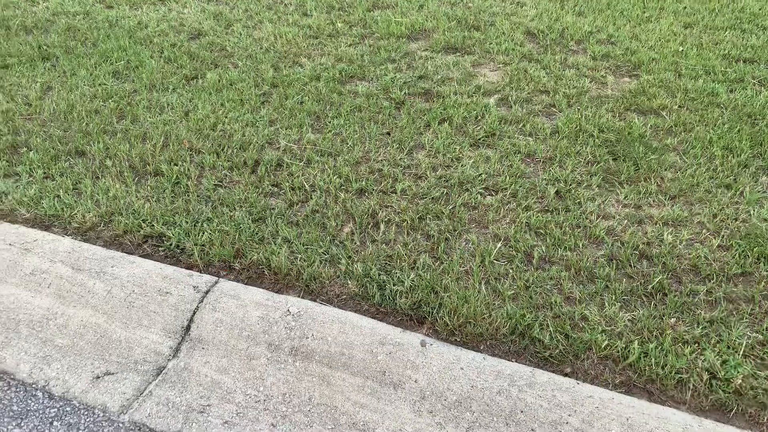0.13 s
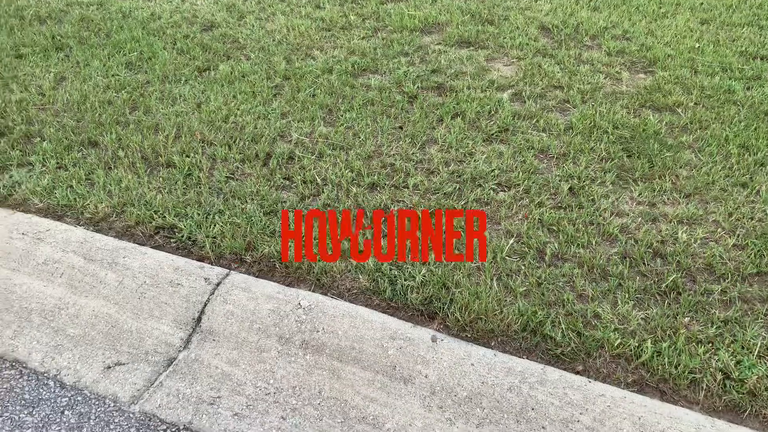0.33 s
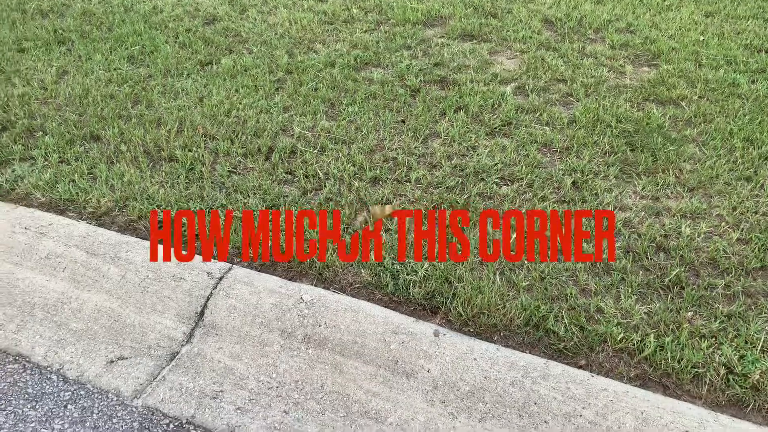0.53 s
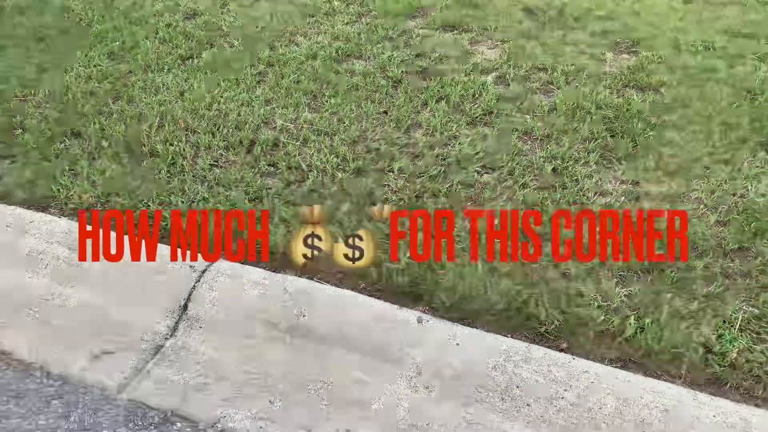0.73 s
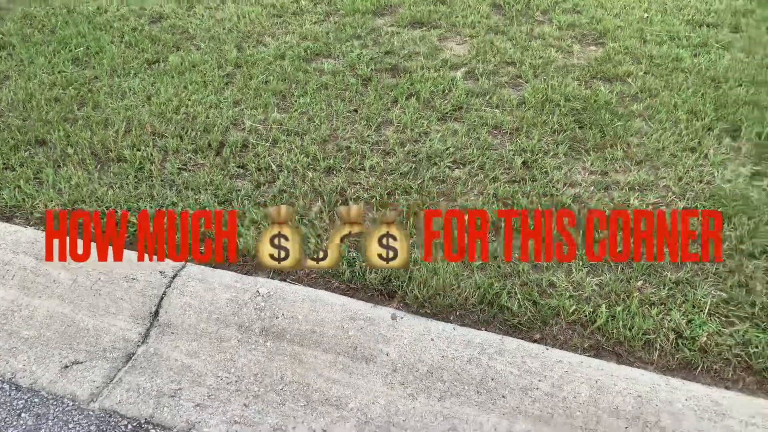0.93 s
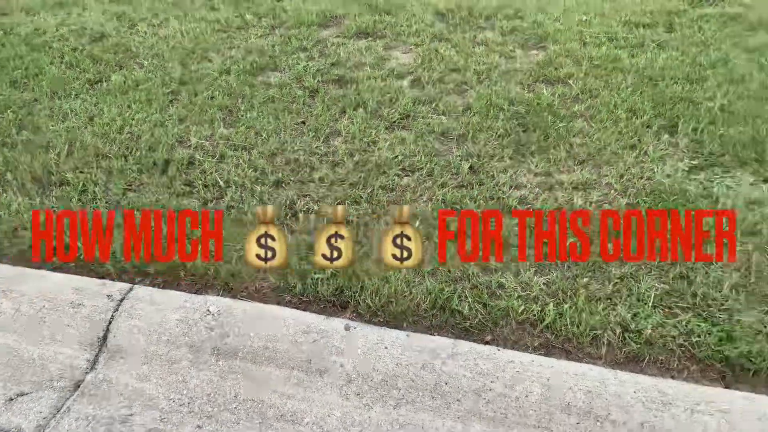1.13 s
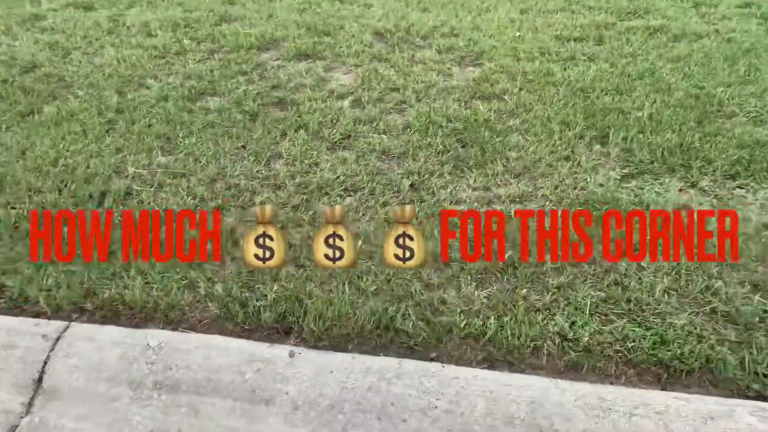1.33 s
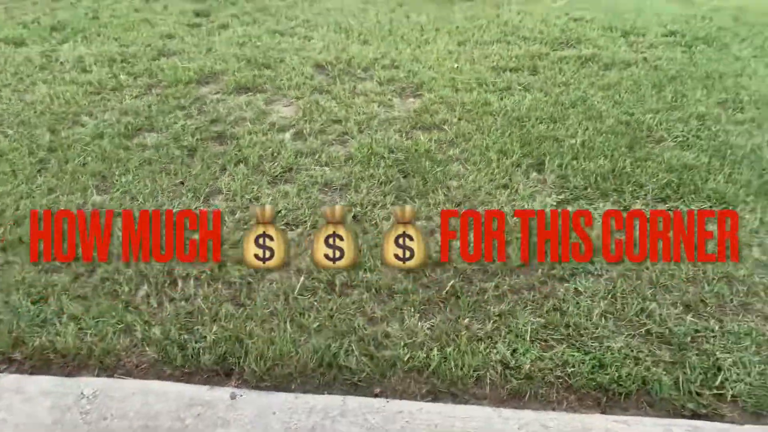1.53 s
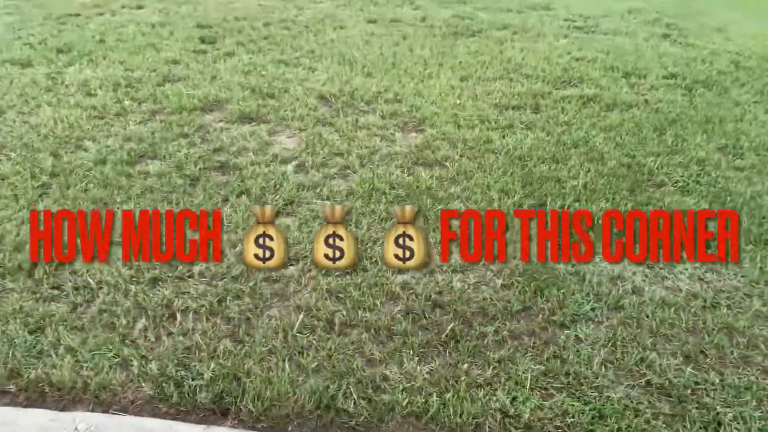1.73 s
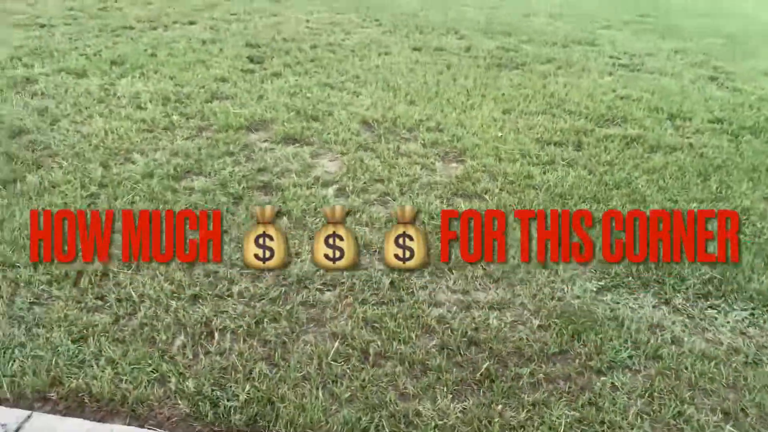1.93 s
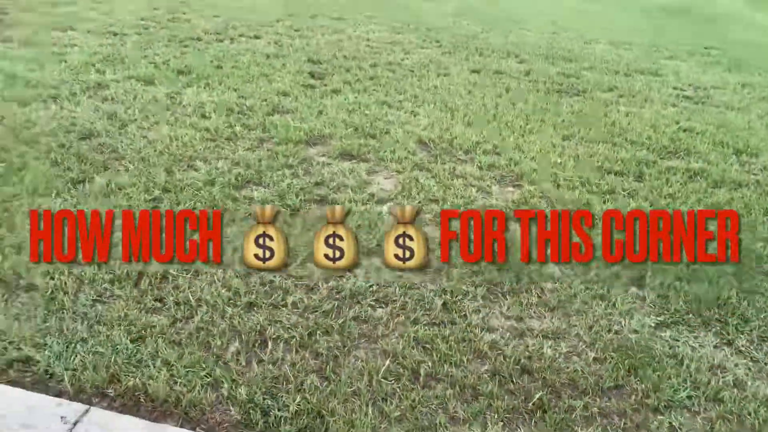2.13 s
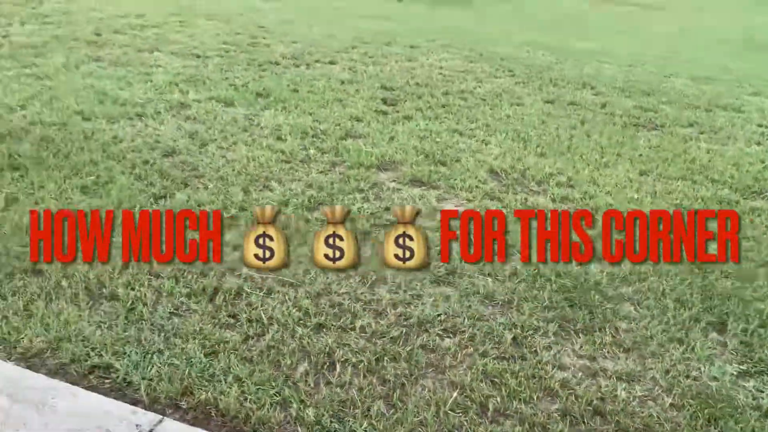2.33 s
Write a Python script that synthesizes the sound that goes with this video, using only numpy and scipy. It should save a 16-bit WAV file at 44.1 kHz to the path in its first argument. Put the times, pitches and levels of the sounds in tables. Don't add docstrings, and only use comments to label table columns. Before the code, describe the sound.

A small petrol mower engine fades in within 0.15 s and runs steadily, about eighteen firings a second, a few metres away outdoors. Puffs ring the muffler, valves clatter, sheet metal rattles, and the fan hums and roars. Airy treble opens until 1.1 s; rattle comes forward around 1.2 s, then recedes by 2 s. Harder firings strike around 2.1 and 2.3 s. Low wind gusts buffet the stereo microphone throughout.

```python
import sys
import numpy as np
from scipy import signal
from scipy.fft import rfft, irfft
from scipy.io import wavfile
from scipy.ndimage import uniform_filter1d

SR = 44100
rng = np.random.default_rng(int(sys.argv[2]) if len(sys.argv) > 2 else 0)


def gain_from_db(level_db):
    decades = np.asarray(level_db, float) / 20
    return 10 ** decades


def persist_wave(psi):
    counts = np.round(np.clip(psi, -1, 1) * 32767).astype(np.int16)
    wavfile.write(sys.argv[1], SR, np.atleast_2d(counts).T)


N = 105795
T = np.arange(N) / SR
FIRE_HZ, JITTER_S = 18.2, 0.001166

# (time [s], level [dB])
GUST_LEVEL = [(0.14, -39), (0.18, -35.5), (0.6, -34.5), (0.62, -25.5), (1.03, -28), (1.18, -23.5),
              (1.22, -30), (1.38, -24.5), (1.65, -32.5), (1.82, -27), (1.86, -55), (1.9, -37),
              (1.99, -32.5), (2.13, -49), (2.15, -31), (2.4, -31)]
# (frequency [Hz], density [dB per Hz])
WIND_SPECTRUM = [(20, -39), (32, -21), (45, -2), (60, -2), (72, 1.5), (90, -5), (150, -10.5), (400, -31)]
# (frequency [Hz], density [dB per Hz])
ROAR_SPECTRUM = [(36, -43), (100, -12), (300, -14.5), (600, -3.5), (1600, -15), (2350, -18), (2600, -23),
                 (3300, -23.5)]
HISS_SPECTRUM = [(3300, 0), (4500, -3.5), (6000, -5), (7300, -10), (8300, -1.5), (9400, -8.5),
                 (10400, -15.5)]
AIR_SPECTRUM = [(10400, -10), (11800, -7.5), (13000, 3.5), (14300, -8), (15600, 0)]
# (time [s], frequency [Hz], level [dB])
FAN_HUM = [
    (0.14, 222.9, -36),
    (0.53, 222.9, -36),
    (0.59, 218.5, -33.5),
    (0.72, 215.8, -34.5),
    (1.28, 219.4, -34.5),
    (1.36, 221.9, -38),
    (1.69, 216.9, -34.5),
    (2.07, 221.5, -33.5),
    (2.28, 212.8, -38),
    (2.4, 220, -34),
]
# (frequency [Hz], width [Hz], level [dB])
DECK_MODES = [(358.4, 17.8, -41.5), (427, 30, -41.5), (268.5, 90, -43.5), (588.4, 28, -46)]
# (frequency [Hz], width [Hz], level [dB])
LOUVRE_MODES = [(2550, 330, 0)]
# (frequency [Hz], width [Hz], level [dB])
CASE_MODES = [(170.4, 43, 6), (109, 13.3, -12), (251.6, 86, -0.5)]
MUFFLER_MODES = [(582.2, 37.5, 7.5), (669, 59, -8), (787, 53.5, -2.5)]
COVER_MODES = [(956, 84, 3.5), (1338, 310, -7)]
SHROUD_MODES = [(2140, 210, -5), (1880, 170, -10.5), (2500, 260, -12.5)]
TAPPET_MODES = [(4140, 960, -2), (3430, 900, -8)]
# (time [s], shroud rattle level [dB], muffler level [dB])
FACING_LEVELS = [
    (0.14, -39.5, -33.5),
    (0.25, -41.5, -36.5),
    (1.12, -40, -32.5),
    (1.2, -33.5, -37.5),
    (1.53, -38.5, -33),
    (2.04, -61.5, -38),
    (2.06, -53, -35.5),
    (2.37, -53, -39.5),
    (2.4, -54, -43),
]
# (place [cycles], rise [s], decay [s], level [dB], spread [dB])
SHROUD_RATTLES = [
    (1, 0.0013, 0.014, 5, 1.1),
    (0.585, 0.0024, 0.0062, 9.5, 0.67),
    (0.21, 0.0018, 0.0053, 6, 0.67),
]
TAPPET_TICKS = [
    (.12, .001, .005, 0, 2),
]
VALVE_CLATTERS = [
    (.26, .003, .006, 0, 1.5),
    (.55, .003, .006, -5, 1.5),
]
EXHAUST_PUFFS = [
    (.35, .004, .008, 0, 1),
    (.78, .003, .006, -9, 1.5),
]
FIRING_THUMPS = [
    (.08, .006, .010, 0, 3),
]
# (time [s], extra level [dB])
HARD_FIRINGS = [
    (.24, 2),
    (.41, 2),
    (.51, 3),
    (.9, 3),
    (2.06, 3),
    (2.115, 7),
    (2.17, 2),
    (2.28, 4),
]
# (multiple [1], level [dB rms])
FIRING_ORDERS = [(2, -55), (3, -45), (4, -50.5), (5, -48.5), (6, -62), (8, -54), (9, -43.5), (10, -43.5)]
# (frequency [Hz], phase [rad])
PORT_LEAD = [(0, 0), (250, .3), (430, 2.2), (650, 1.4), (1500, .8), (3000, -2.4), (7300, -3.14),
             (16200, -15.7)]
# (frequency [Hz], coherence [0-1])
PORT_LIKENESS = [(60, 1), (230, 0.98), (320, 0.5), (700, 0.94), (1500, 0.54), (3000, 0.61), (4600, 0.033),
                 (7000, 0.83)]
# (frequency [Hz], difference [dB])
PORT_LEAN = [(60, 2.5), (130, -4.5), (290, -3), (640, 2), (1410, 2.0), (3100, 3.0), (6810, 0.5),
             (15000, -0.5)]


def noise():
    return rng.standard_normal(N)


def evened(x):
    return x / np.sqrt(np.mean(x ** 2) + 1e-20)


def read(points, hz):
    f, value = np.transpose(points)
    return np.interp(np.log(hz + 1), np.log(f + 1), value)


def curve(rows, axis=1):
    columns = np.transpose(rows)
    return np.interp(T, columns[0], columns[axis])


def ramp(start, length):
    return np.clip((T - start) / length, 0, 1)


def throb(place):
    return np.cos(2 * np.pi * (FIRE_HZ * T - place))


def ring(x, body):
    out = 0
    for k, (hz, width, db) in enumerate(body):
        r = np.exp(-2 * np.pi * width / SR)
        poles = np.full(3, r * np.exp(2j * np.pi * hz / SR))
        mode = signal.lfilter([(1 - r) ** 3], np.poly(poles), x).real
        out = out + (-1) ** k * gain_from_db(db) * mode
    return out


def bursts(rows, body, luck, level_db, knock=0, extra_db=0):
    drive, share = 0, np.clip(knock, 0, 1)
    for k, (place, rise, decay, db, spread_db) in enumerate(rows):
        turns = T * FIRE_HZ - place + 1
        since, cycle = (turns % 1) / FIRE_HZ, turns.astype(int)
        size = gain_from_db(spread_db * luck[cycle, k])
        envelope = (1 - np.exp(-since / rise)) ** 2 * np.exp(-since / decay)
        puff = envelope * size * noise()
        delay = JITTER_S * (2 + luck[cycle + 1, k - 1])
        click = size * (np.diff(1. * (since > delay), prepend=1) > 0)
        drive = drive + gain_from_db(db) * (share * evened(click) + np.sqrt(1 - share ** 2) * evened(puff))
    return gain_from_db(level_db) * evened(ring(drive * gain_from_db(extra_db), body))


def wash(spectrum, low_hz, high_hz, patchy_db, flicker_db, early_db=0):
    frames, hz = N // 256 + 5, np.fft.rfftfreq(1024, 1 / SR)
    a, b, patches = rng.standard_normal((frames, 513, 3)).T
    patches = uniform_filter1d(uniform_filter1d(patches, 10, 0), 10, 1)
    flicker = uniform_filter1d(rng.standard_normal(frames), 6)
    field = patchy_db * evened(patches) + flicker_db * evened(flicker)
    shut = np.clip(1 - (np.arange(frames) * 256 / SR - 0.2) / 0.9, 0, 1)
    field = field + early_db * shut * np.clip((hz[:, None] - 12200) / 2500, 0, 1)
    edge = ((hz >= low_hz) & (hz < high_hz))[:, None]
    z = (a + 1j * b) * gain_from_db(read(spectrum, hz)[:, None] + field) * edge
    return evened(signal.istft(z, nperseg=1024, noverlap=768)[1][:N])


def wind():
    hz = np.fft.rfftfreq(N, 1 / SR)
    shape = gain_from_db(read(WIND_SPECTRUM, hz) - 60 * (hz > 400))
    rumble = evened(irfft(rfft(noise()) * shape, N))
    lumps = evened(uniform_filter1d(uniform_filter1d(noise(), 900), 900))
    return gain_from_db(curve(GUST_LEVEL) - 2.5) * evened(rumble * gain_from_db(1.5 * lumps))


def fan_air():
    roar = wash(ROAR_SPECTRUM, low_hz=80, high_hz=3300, patchy_db=2, flicker_db=.8)
    hiss = wash(HISS_SPECTRUM, low_hz=3300, high_hz=10400, patchy_db=1.5, flicker_db=.8)
    air = wash(AIR_SPECTRUM, low_hz=10400, high_hz=15650, patchy_db=1.5, flicker_db=.8, early_db=-22)
    return gain_from_db(-33 + 1.5 * throb(0.49)) * roar + gain_from_db(-49) * hiss + gain_from_db(-61.5) * air


def fan_hum():
    turn = 2 * np.pi * np.cumsum(curve(FAN_HUM)) / SR
    fuzz_pole = np.exp(-np.pi * 8.3 / SR)
    fuzz = signal.lfilter([1], [1, -fuzz_pole], rng.standard_normal((2, N)))
    waver = 1 + gain_from_db(-14.5) * (evened(fuzz[0]) + 1j * evened(fuzz[1])) / np.sqrt(2)
    octave = gain_from_db(-7) * np.exp(2j * turn)
    hum = (waver * (np.exp(1j * turn) + octave)).real
    return np.sqrt(2) * gain_from_db(curve(FAN_HUM, axis=2) + 3.95 * throb(.33)) * hum


def deck():
    return sum(gain_from_db(db) * evened(ring(noise(), [(hz, width, 0)])) for hz, width, db in DECK_MODES)


def louvre():
    return gain_from_db(-46.5) * ramp(1.46, 0.33) * evened(ring(noise(), LOUVRE_MODES))


def shroud(luck):
    rattle = bursts(SHROUD_RATTLES, SHROUD_MODES, luck, level_db=-46)
    rush = gain_from_db(-45.5) * evened(ring(noise(), SHROUD_MODES))
    return (rattle + rush) * evened(gain_from_db(curve(FACING_LEVELS)))


def tappet_ticks(luck):
    return bursts(TAPPET_TICKS, TAPPET_MODES, luck, level_db=-53.5)


def valve_clatter(luck):
    return bursts(VALVE_CLATTERS, COVER_MODES, luck, level_db=-43.5, knock=0.58)


def exhaust(luck):
    cycle = (T * FIRE_HZ).astype(int)
    harder = sum(db * (cycle == int(s * FIRE_HZ)) for s, db in HARD_FIRINGS)
    facing = curve(FACING_LEVELS, axis=2)
    return bursts(EXHAUST_PUFFS, MUFFLER_MODES, luck, level_db=-34.5, knock=.8, extra_db=harder + facing)


def thump(luck):
    return bursts(FIRING_THUMPS, CASE_MODES, luck, level_db=-42, knock=0.75)


def firing_tones():
    low = 0
    for k, db in FIRING_ORDERS:
        low = low + gain_from_db(db) * np.cos(2 * np.pi * (k * FIRE_HZ * T + rng.random()))
    return np.sqrt(2) * low


def engine(luck):
    background = fan_air() + deck() + louvre()
    return background + shroud(luck[3]) + valve_clatter(luck[2]) + exhaust(luck[1]) + thump(luck[0])


def scene():
    luck = np.clip(rng.standard_normal((5, 60, 3)), -2, 2)
    clean = rfft(fan_hum() + tappet_ticks(luck[4]) + firing_tones())
    a, b = (rfft(wind() + engine(luck)) for _ in range(2))
    hz = np.fft.rfftfreq(N, 1 / SR)
    same = np.clip(read(PORT_LIKENESS, hz), 0, 1)
    lag = np.exp(-1j * np.interp(hz, *np.transpose(PORT_LEAD)))
    lean = gain_from_db(read(PORT_LEAN, hz) / 2)
    left = clean + a
    right = lag * (clean + same * a) + np.sqrt(1 - same ** 2) * b
    return irfft(np.array([left * lean, right / lean]), N)


def band_limit(x):
    return signal.sosfilt(signal.butter(12, 15590, fs=SR, output="sos"), x)


def record(dry):
    mix = dry * ramp(0.07, 0.054) ** 1.34
    return band_limit(mix)


dry = scene()
out = record(dry)
persist_wave(out)
```